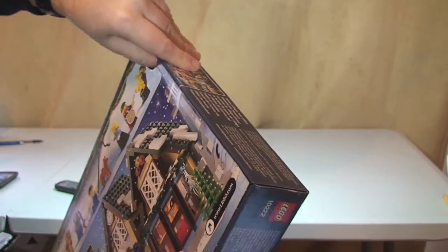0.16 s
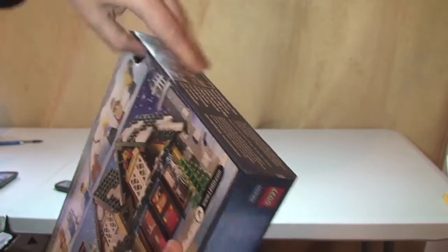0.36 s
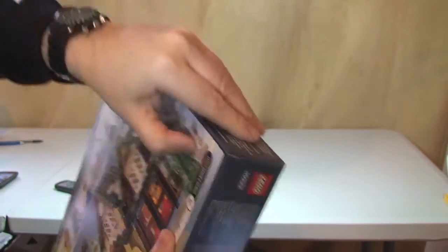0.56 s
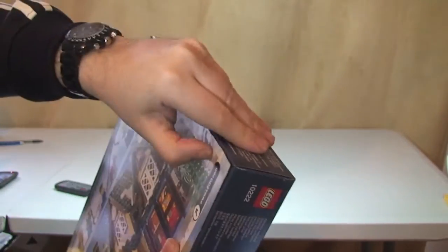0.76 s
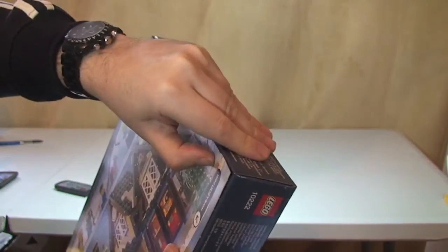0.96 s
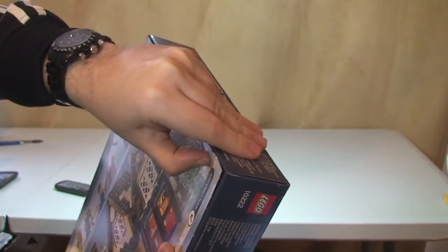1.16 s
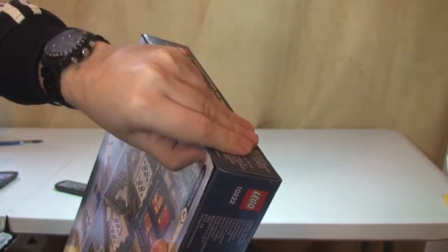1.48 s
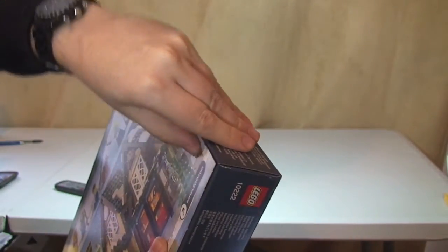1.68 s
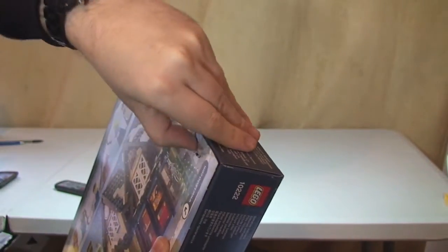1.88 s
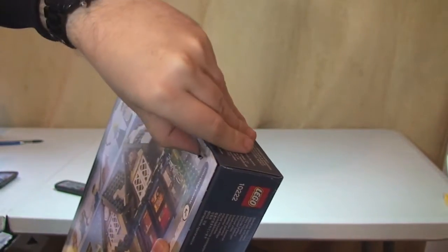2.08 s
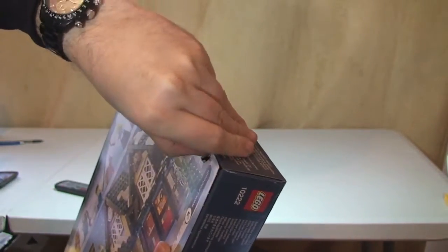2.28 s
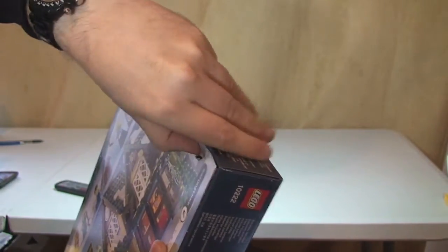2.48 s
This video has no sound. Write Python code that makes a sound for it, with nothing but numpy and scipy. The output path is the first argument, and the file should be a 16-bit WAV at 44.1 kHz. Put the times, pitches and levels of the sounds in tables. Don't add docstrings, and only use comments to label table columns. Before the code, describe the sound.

A hand works at the stuck flap of a glossy cardboard box: soft taps and short creaks first, then sharper nail snaps and hollow knocks, with light rustling, close up in stereo in a small quiet room.

```python
import sys
import numpy as np
from scipy import signal
from scipy.fft import rfft, irfft
from scipy.io import wavfile
from scipy.ndimage import uniform_filter1d

SR = 44100
rng = np.random.default_rng(int(sys.argv[2]) if len(sys.argv) > 2 else 0)


def log_audio(samples):
    frames = np.atleast_2d(samples).T
    limited = np.clip(frames, -1, 1)
    pcm = np.round(limited * 32767).astype(np.int16)
    wavfile.write(sys.argv[1], SR, pcm)


def amplitude_ratio(level_db):
    exponent = np.asarray(level_db, float) / 20
    return 10 ** exponent


N = 116865

# (frequency [Hz], level [dB])
SLIP_SPECTRUM = [(200, -31.5), (700, 11), (1800, 9), (2650, -3), (3400, 1.5), (5000, -5), (12500, -13.5),
                 (16000, -28)]
# (frequency [Hz], level [dB], t60 [s])
WALL_MODES = [(376, 0, .075), (490, -7, .04), (630, -1, .05)]
# (frequency [Hz], level [dB], t60 [s])
FLAP_MODES = [(300, -10, .03), (480, -6, .02), (610, 0, .025), (790, -1, .025), (2900, -9, .008)]


def evened(x):
    return x / np.sqrt(np.mean(x ** 2) + 1e-20)


def read(points, hz):
    f, value = np.transpose(points)
    return np.interp(np.log(hz + 1), np.log(f + 1), value)


def causal(points):
    log_gain = np.log(amplitude_ratio(read(points, abs(np.fft.fftfreq(4096, 1 / SR)))))
    click = np.fft.ifft(np.exp(np.conj(signal.hilbert(log_gain)))).real[:1024]
    return click / np.linalg.norm(click)


def ring(modes):
    t = np.arange(SR // 4) / SR
    answer = sum(amplitude_ratio(db - 60 * t / t60) * np.sin(2 * np.pi * hz * t) for hz, db, t60 in modes)
    return answer / abs(answer).max()


def through(x, response):
    return signal.fftconvolve(x, response)[:len(x)]


def band(x, hz, kind):
    return signal.sosfilt(signal.butter(N=3, Wn=hz, btype=kind, fs=SR, output="sos"), x)


def snaps():
    # (time [s], tick level [dB], ring level [dB], thud level [dB], dullness [1])
    blows = [(.001, -16.5, -32.5, -27, 0.74), (0.016, -28, -59, -27, 0), (.1623, -36, -60, -60, 0.3),
             (.275, -14, -23.5, -40, .6), (.323, -34, -43, -33, .6), (.4237, -31, -40, -53, 0.65),
             (.4453, -35, -38, -46, 0.64), (0.4499, -39, -50, -41, 0.42), (0.751, -20.5, -40.5, -37, -0.18),
             (0.786, -41, -40.5, -70, 1), (.8515, -28, -39, -51, .3), (1.110, -1.5, -17, -23, -0.32),
             (1.174, -9, -19, -30, -0.37), (1.358, -37, -60, -57, 0.58), (1.3637, -48, -63, -72, 0.4),
             (1.3884, -0.5, -22.5, -23, -0.64), (1.3942, -18, -39, -39, -0.17),
             (1.477, -22, -24, -55, -0.15), (1.4847, 8.5, -9.5, -8, 0.23), (1.616, -9.5, -24, -21.5, 0.66),
             (1.6235, -19, -38, -17.5, 0.42), (1.915, -25, -46, -34.5, 0.26), (1.97, -23, -44, -57, 0.74),
             (1.976, -27, -48, -46, 0.46), (2.067, -37, -49, -42, 0.22), (2.2395, -1, -13.5, -8.5, 0.35),
             (2.2431, 5, -3.5, -3.5, 0.72), (2.265, -30, -34, -26, 0.76), (2.276, -32, -29, -45, 0.95),
             (2.287, -22, -30, -22.5, 0.47), (2.3725, -16.5, -28, -50, 0.59),
             (2.427, -25.5, -44, -35.5, 0.79), (2.514, -33, -38, -36.5, 0.5),
             (2.536, -20.5, -34.5, -32, 0.63)]
    # (frequency [Hz], level [dB])
    tick_spectrum = [(470, -26), (800, 6.5), (2500, 0), (4500, -3.5), (6500, -1), (13000, -8.5),
                     (15500, -26), (17000, -51)]
    # (frequency [Hz], level [dB], t60 [s])
    edge_modes = [(663, 7.5, 0.049), (623.4, -12, 0.18), (1340, -29.5, 0.037), (2468, -7, 0.027)]
    panel_modes = [(719, 11, 0.033), (620, -9.5, 0.089), (756, -1, .06), (1010, -9.5, 0.09),
                   (1420, -9.5, .04)]
    cavity_modes = [(170, 15, 0.015), (243, 1.5, 0.033), (314.5, 14, 0.057), (382.5, 6.5, 0.17),
                    (527, 11.5, 0.019)]
    length = 8000
    ticks, edges, panels, thuds = np.zeros((4, N + length))
    t = np.arange(length) / SR
    splinter = amplitude_ratio(-20) * np.exp(-t / .0005)
    crackle = amplitude_ratio(-28 - 60 * t / .11)
    noises = rng.standard_normal((len(blows), length))
    for (s, tick_db, ring_db, thud_db, dull), noise in zip(blows, noises):
        at = round(s * SR)
        dull = np.clip(dull, -1, 1)
        tick = noise * (splinter + crackle) + (t == 0)
        ticks[at:at + length] += amplitude_ratio(tick_db) * ((1 - dull) * tick + dull * band(tick, 4410, "low"))
        flesh = np.clip((dull - .4) / .2, 0, 1)
        edges[at] += amplitude_ratio(ring_db) * (1 - flesh)
        panels[at] += amplitude_ratio(ring_db) * flesh
        thuds[at] -= amplitude_ratio(thud_db)
    body = through(edges, ring(edge_modes)) + through(panels, ring(panel_modes))
    body += through(thuds, ring(cavity_modes))
    return (through(ticks, causal(tick_spectrum)) + body)[:N]


def rustle():
    # (time [s], level [dB])
    pressure = [(0.0, -39), (.4, -49), (0.83, -45.5), (1.05, -24), (1.2, -78), (1.44, -33.5), (1.59, -46),
                (1.721, -25), (1.86, -49), (2.03, -48), (2.23, -35), (2.3, -63), (2.4, -36), (2.539, -31),
                (2.65, -70)]
    s, db = np.transpose(pressure)
    grains_per_s, spread_db = 900, 6.5
    struck = rng.random(N) < grains_per_s / SR
    size = amplitude_ratio(spread_db * np.minimum(rng.exponential(1, N), 2))
    grains = struck * rng.standard_normal(N) * size
    body = evened(through(grains, ring(WALL_MODES + FLAP_MODES)))
    contact = evened(through(grains, causal(SLIP_SPECTRUM)))
    return (body + amplitude_ratio(-17) * contact) * amplitude_ratio(-15.5 + np.interp(np.arange(N) / SR, s, db))


def air():
    # (frequency [Hz], level [dB])
    noise_spectrum = [(20, -10), (60, -0.5), (100, 4), (180, -5.5), (400, 3.5), (1000, 1), (12000, -22.5),
                      (16000, -27)]
    # (frequency [Hz], likeness [1])
    likeness = [(30, 0.45), (100, 0.89), (300, 0.77), (8000, 0.35), (13000, 0.88)]
    hz = np.fft.rfftfreq(N, 1 / SR)
    a, b = rfft(rng.standard_normal((2, N)))
    same = np.clip(read(likeness, hz), 0, 1)
    pair = np.array([a, same * a + np.sqrt(1 - same ** 2) * b])
    noise = irfft(pair * amplitude_ratio(read(noise_spectrum, hz)), N)
    hum = np.sin(2 * np.pi * 100 * np.arange(N) / SR)
    return amplitude_ratio(-54.5) * evened(noise) + amplitude_ratio(-74) * hum


def slides():
    # (start [s], length [s], level [dB], centre [Hz], width [Hz])
    strokes = [(0.436, 0.13, -50, 1240, 1130), (0.494, 0.099, -50.5, 2200, 770),
               (1.1, 0.056, -48.5, 3900, 6600), (0.44, 0.16, -55, 146, 133),
               (0.092, 0.18, -56, 6000, 13000), (1.4, 0.11, -43, 3300, 3500),
               (1.955, 0.057, -49.5, 189, 39), (2.391, 0.22, -58, 530, 590),
               (1.193, 0.12, -62.5, 11500, 4400), (2.47, 0.18, -64.5, 11800, 4500),
               (.31, 0.056, -48, 180, 110), (1.7, 0.14, -62, 260, 155)]
    t, out = np.arange(N) / SR, np.zeros(N)
    noises = rng.standard_normal((len(strokes), N))
    for (start, length, db, hz, width), noise in zip(strokes, noises):
        grainy = noise * abs(noise)
        hiss = band(grainy, [max(hz - width / 2, 20), hz + width / 2], "band")
        swell = np.sin(np.pi * np.clip((t - start) / length, 0, 1))
        out += amplitude_ratio(db) * evened(hiss) * swell
    return out


def slips(rows, jitter):
    s, hz, db = np.transpose(rows)
    t = np.arange(N) / SR
    wander, size, grit, drag = rng.standard_normal((4, N))
    rate = np.interp(t, s, hz) * np.exp(jitter * evened(uniform_filter1d(wander, size=120)))
    releases = np.diff(np.floor(np.cumsum(rate) / SR), prepend=0)
    spread_db = 1.5 * (-0.5 + 10 * jitter)
    pulse = releases * amplitude_ratio(spread_db * np.clip(size, -2, 2))
    puff = band(grit * through(pulse, np.exp(-t[:400] / .0008)), 3500, "high")
    smear = band(drag * through(pulse, np.exp(-t[:400] / .0015)), 500, "high")
    train = pulse * np.sqrt(SR / hz.mean()) + amplitude_ratio(-4) * evened(puff) + amplitude_ratio(-11) * evened(smear)
    inside = (t > s[0]) & (t < s[-1])
    return train * amplitude_ratio(np.interp(t, s, db)) * inside


def creaks():
    # (time [s], slip rate [Hz], level [dB])
    squeaks = [
        [(.667, 298, -40), (.685, 340, -39), (.7, 368, -37), (.712, 371, -40), (.72, 372, -46)],
        [(.851, 355, -34), (.862, 392, -37), (.879, 473, -35), (.9, 478, -35), (.92, 425, -36), (.94, 370, -35),
         (.96, 360, -35), (.974, 350, -38)],
        [(1.003, 320, -38), (1.014, 375, -34), (1.024, 440, -35), (1.034, 520, -36), (1.042, 480, -44)],
        [(1.7, 335, -50), (1.72, 322, -46), (1.742, 308, -39), (1.76, 368, -39), (1.773, 418, -37),
         (1.788, 380, -37), (1.8, 375, -42)],
        [(2.06, 326, -50), (2.069, 350, -39), (2.083, 362, -37), (2.101, 412, -37), (2.121, 390, -38),
         (2.135, 363, -37), (2.148, 381, -37), (2.17, 376, -39), (2.182, 358, -48)],
    ]
    squeak_jitter = [.08, .012, .03, .055, .02]
    # (time [s], slip rate [Hz], level [dB])
    scrapes = [
        [(.179, 200, -40), (.186, 230, -34), (.2, 300, -34), (.225, 200, -33), (.25, 265, -35),
         (.268, 200, -38), (.29, 130, -44)],
        [(.32, 240, -44), (.335, 400, -38), (.348, 520, -31), (.36, 520, -44)],
        [(.548, 420, -39), (.57, 380, -39), (.58, 310, -36), (.603, 360, -38), (.612, 300, -46)],
        [(2.505, 300, -54), (2.514, 250, -45), (2.528, 220, -47), (2.538, 200, -44), (2.552, 220, -54)],
        [(.972, 260, -37), (.985, 225, -36), (.996, 260, -37), (1.004, 320, -38)],
        [(1.042, 450, -44), (1.05, 375, -36), (1.062, 372, -37), (1.068, 370, -46)],
    ]
    scrape_jitter = [.13, .18, .25, .3, .14, .1]
    squeak = sum(slips(*pair) for pair in zip(squeaks, squeak_jitter))
    scrape = sum(slips(*pair) for pair in zip(scrapes, scrape_jitter))
    wall, flap = ring(WALL_MODES), ring(FLAP_MODES)
    contact = through(squeak + scrape, causal(SLIP_SPECTRUM))
    wall_sound = through(squeak, wall / np.linalg.norm(wall))
    flap_sound = through(scrape, flap / np.linalg.norm(flap))
    return contact + amplitude_ratio(0.5) * wall_sound + amplitude_ratio(1.5) * flap_sound


def room(x):
    # (delay [s], level [dB])
    echoes = [(.0021, -24.5), (.0064, -12), (.0074, -29), (.0084, -21), (0.011, -19.5), (0.0217, -22.5),
              (0.024, -20.5)]
    # (frequency [Hz], t60 [s])
    decay = [(200, 0.34), (530, 0.24), (1400, 0.21), (3700, 0.21), (9700, 0.19)]
    # (frequency [Hz], level [dB])
    tail_bass = [(400, -6), (1500, 0)]
    taps = np.zeros((2, SR // 2))
    at = np.arange(300, SR // 2 - 20, 20) + rng.integers(0, 20, (2, (SR // 2 - 301) // 20))
    np.put_along_axis(taps, at, rng.choice([-1., 1.], at.shape), 1)
    same = 0.91
    taps[1] = same * taps[0] + np.sqrt(1 - same ** 2) * taps[1]
    hz, t, z = signal.stft(taps, SR, nperseg=256)
    fade_db = read(tail_bass, hz)[:, None] - 60 * t / read(decay, hz)[:, None]
    tail = signal.istft(z * amplitude_ratio(fade_db), SR, nperseg=256)[1]
    tail *= amplitude_ratio(-9.5) / np.linalg.norm(tail[0])
    tail[:, 0] += 1
    for delay, db in echoes:
        tail[:, round(delay * SR)] += amplitude_ratio(db)
    return signal.fftconvolve(x[None], tail, axes=1)[:, :N]


def scene():
    # (frequency [Hz], level [dB])
    left_level = [(60, 0), (200, 1.5), (600, 4), (1200, 3.5), (3000, 1), (8000, 0), (15000, 0)]
    # (frequency [Hz], phase [rad])
    left_lead = [(200, .15), (600, .3), (2000, .3), (4500, .15), (7000, .5), (10000, .55), (12000, .03)]
    hz = np.fft.rfftfreq(N, 1 / SR)
    lean = amplitude_ratio(read(left_level, hz) / 2) * np.exp(.5j * read(left_lead, hz))
    box = snaps() + rustle() + creaks()
    box_low_hz = 160.6
    for _ in range(2):
        box = band(box, box_low_hz, "high")
    heard = rfft(room(box + slides()))
    return irfft(heard * np.array([lean, 1 / lean]), N) + air()


def band_limit(x):
    return signal.sosfilt(signal.butter(12, 16550, fs=SR, output="sos"), x)


def record(dry):
    ceiling = .9
    squash = band(ceiling * np.tanh(dry / ceiling) - dry, 90, "high")
    return band_limit(dry + squash)


dry = scene()
out = record(dry)
log_audio(out)
```